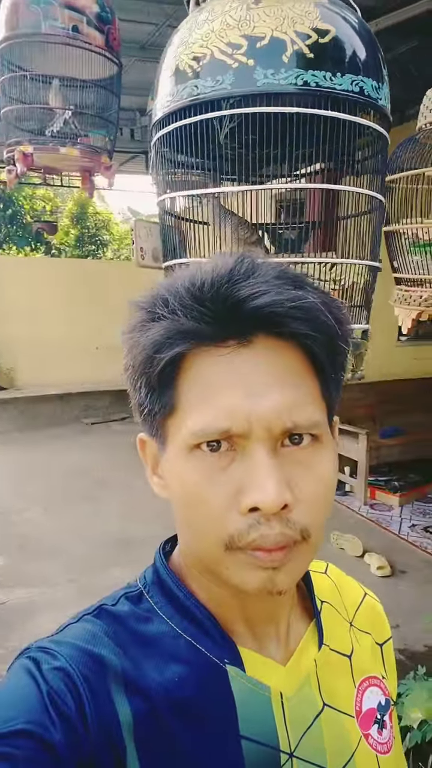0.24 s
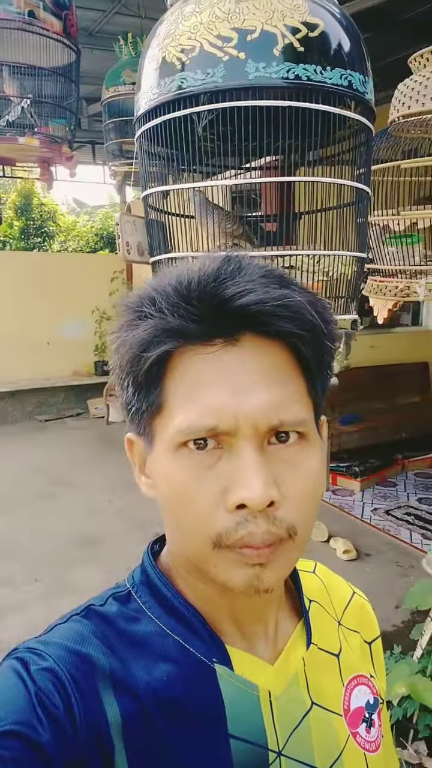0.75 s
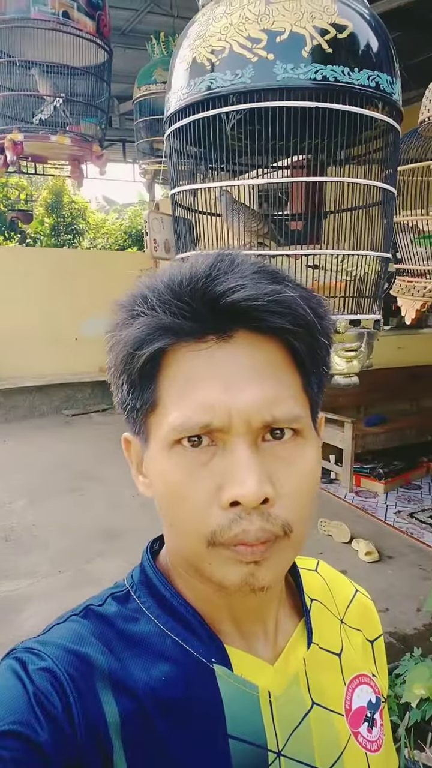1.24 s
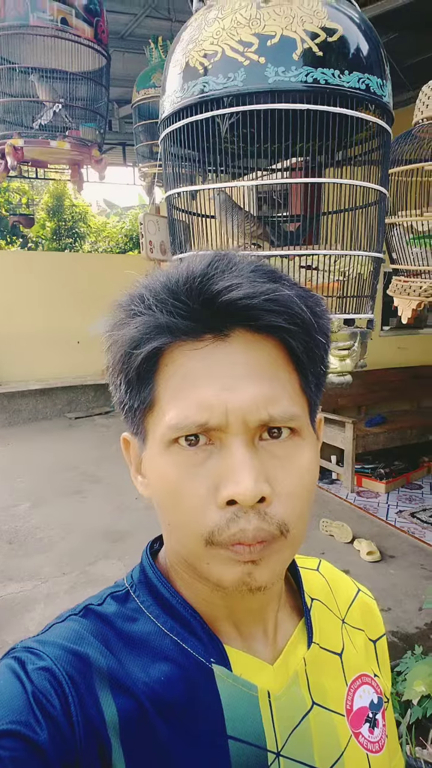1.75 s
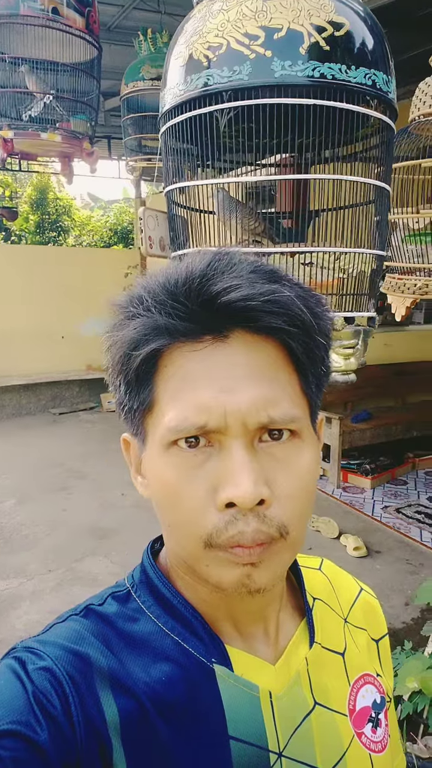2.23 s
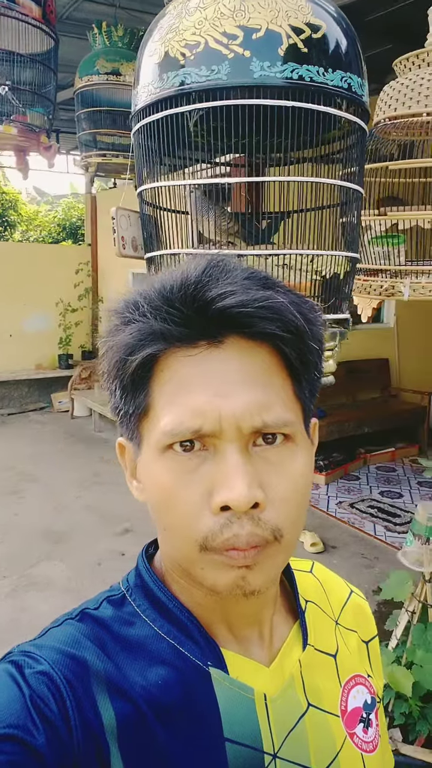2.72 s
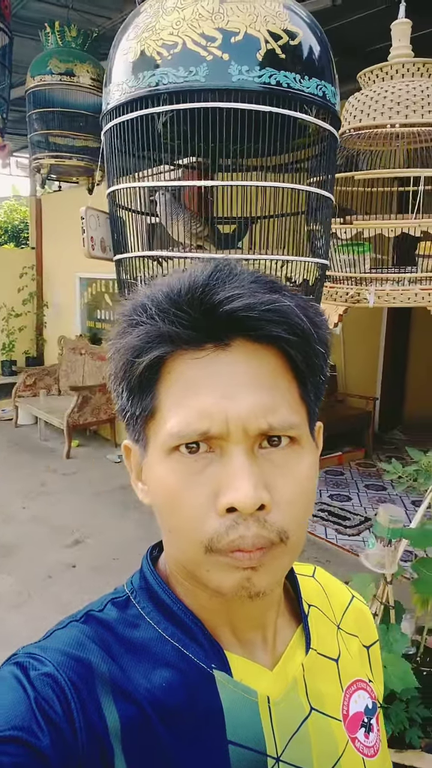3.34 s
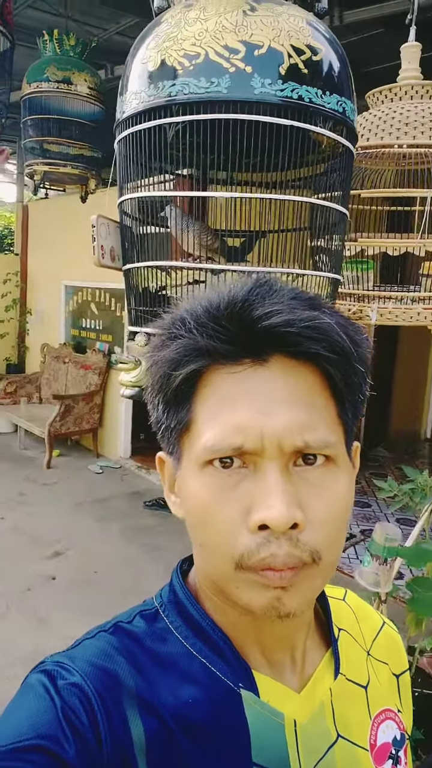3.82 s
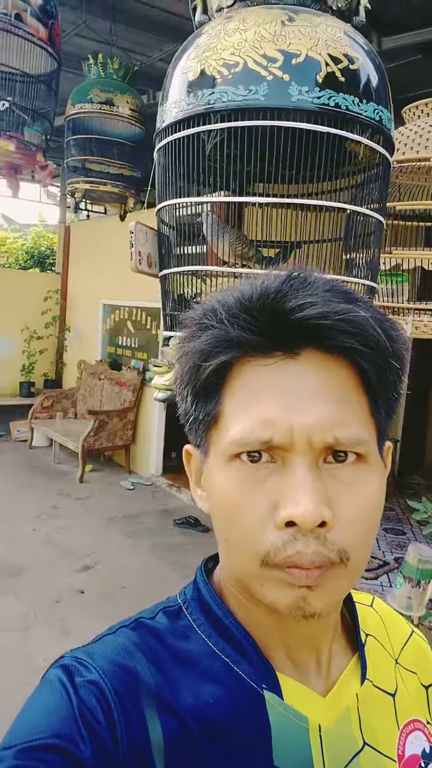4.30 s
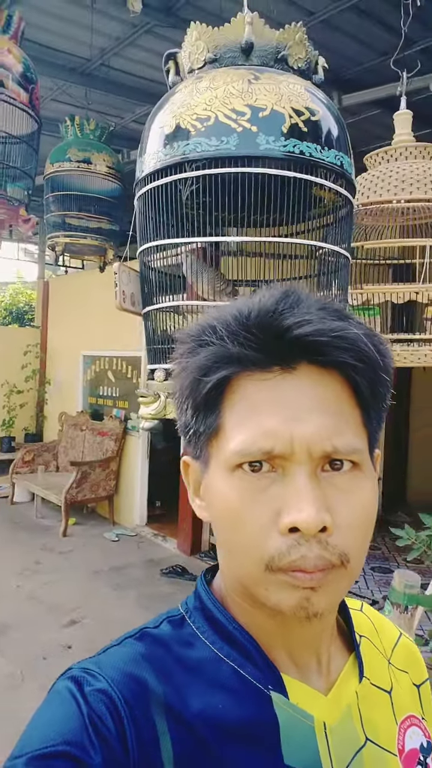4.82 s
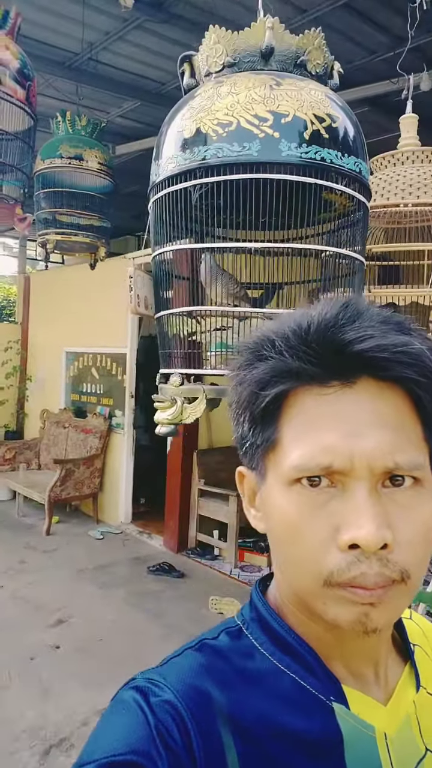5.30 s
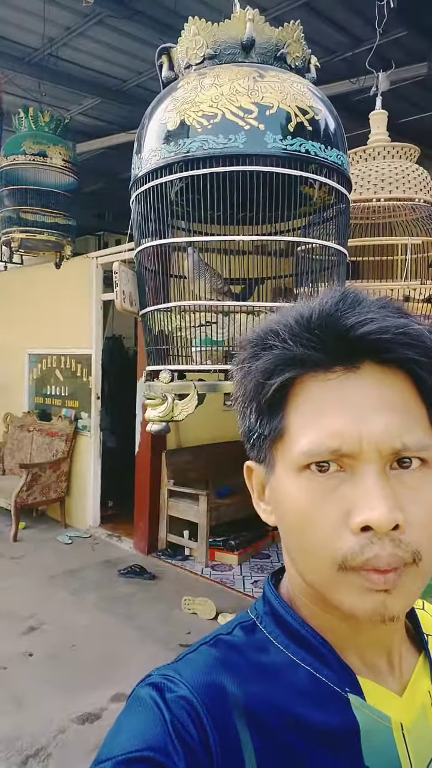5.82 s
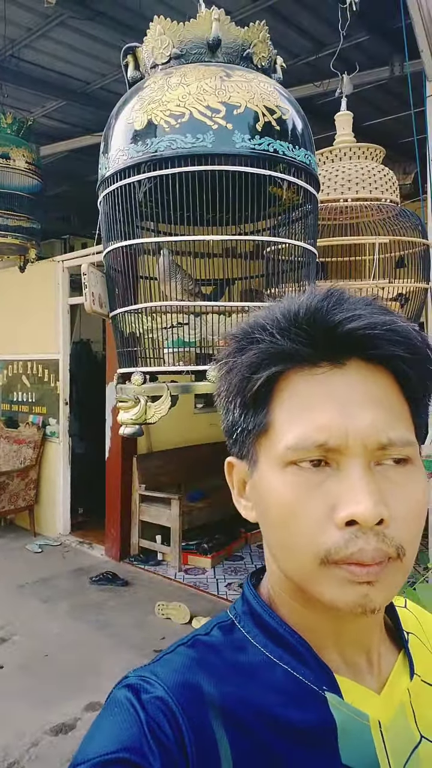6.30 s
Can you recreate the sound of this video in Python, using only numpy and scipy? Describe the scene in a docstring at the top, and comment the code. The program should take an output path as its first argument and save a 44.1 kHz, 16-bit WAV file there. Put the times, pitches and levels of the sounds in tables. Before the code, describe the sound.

Under a metal porch roof, a caged dove sings two nearly pure, stuttering phrases, each a held fluttering note, four quick pulses and a closing note. Between and beneath them another dove repeats soft arched coos. Small birds chip and slur in the background, and a loud whistle bursts out late. Quiet traffic hum and cloth rustle on a hand-held microphone run throughout.

```python
"""A caged zebra dove sings two stuttering phrases under a metal porch roof: near-pure tones that rasp and scoop
up. A second dove repeats soft arched tones that waver as they rise. Sliding tones make small birds' chirps and
whistles from other cages; a warbling tone makes a far trill. Shaped noise and a low harmonic tone make the
street's hum. The hand-held microphone picks up noise rustle, decaying noise ticks and low sine bumps; bursts of
high noise come and go."""
import sys
import numpy as np
from scipy import signal
from scipy.fft import rfft, irfft
from scipy.io import wavfile
from scipy.ndimage import map_coordinates

SR = 44100
rng = np.random.default_rng(int(sys.argv[2]) if len(sys.argv) > 2 else 0)


def output_pcm(signal):
    """Save a mono or channel-first signal as 16-bit PCM at the path in sys.argv[1].

    Samples are clipped to [-1, 1] before scaling.
    """
    pcm = np.clip(np.atleast_2d(signal).T, -1, 1) * 32767
    wavfile.write(sys.argv[1], SR, np.round(pcm).astype(np.int16))


N = 288855
TIME = np.arange(N) / SR

# Street fading unevenly. Each row: time in seconds, traffic and airy hiss in dB before their lifts in the mix.
STREET_LEVELS = [(0, -55, -61.5), (.9, -56, -65.5), (2.5, -57.5, -66), (3.1, -58, -72), (4.7, -57.5, -71),
                 (5.1, -60.5, -74), (6.55, -61.5, -71)]
# Far engine. Each row: time in seconds, mean cycles per second, level in dB before trim and throb.
ENGINE_COURSE = [(.1, 21.6, -57), (.6, 24.1, -57.5), (1.9, 24, -60), (2.15, 23.5, -57.5),
                 (2.6, 21.4, -59.5), (3.1, 23.2, -72), (4.3, 23.8, -59), (5.1, 21.8, -69.5),
                 (6.55, 21.3, -64)]
# Engine harmonics. Each row: multiple of the cycle rate, relative level in dB.
ENGINE_HARMONICS = [(2, -14), (4, -1), (5, -2.5), (6, -15.5), (7, -14.5), (8, -14), (9, -12.5)]
# Noise spectra. Each row: frequency in Hz, relative density in dB per Hz.
TRAFFIC_SPECTRUM = [(40, -23), (100, 6.5), (160, 1.5), (210, 0.5), (400, -2.5), (560, 1.5), (1000, -1),
                    (1600, -3.5), (2600, -8.5), (4000, -19.5), (8000, -23)]
RUMBLE_SPECTRUM = [(20, 8), (35, -4), (55, 7), (75, 0.5), (140, -15.5), (400, -59)]
HISS_SPECTRUM = [(1000, -4.5), (2500, 3.5), (4000, 3), (6000, -9), (7800, 1.5), (9200, -17.5), (15500, -31)]
RUSTLE_SPECTRUM = [(3000, -18), (6000, -4), (7800, 1.5), (9200, -12.5), (11000, -10), (13000, -1.5),
                   (15500, 4.5)]
SNAP_SPECTRUM = [(3000, -4), (6000, -12), (8000, 0.5), (9500, -14.5), (12000, -2), (15500, 1.5)]

# Steady rustle of the hand on the microphone. Each row: time in seconds, level in dB before flicker and lift.
RUSTLE_LEVELS = [(0, -59), (.35, -60.5), (.65, -64.5), (1.1, -60.5), (2.3, -60), (2.5, -64), (4.7, -62),
                 (6.55, -63.5)]
RUSTLE_FLICKER_DB, RUSTLE_FLICKER_HZ = 2.7, 14
# Bursts of high noise. Each row: start in seconds, length in seconds, crest level in dB before the lift.
NOISE_BURSTS = [(0.403, .07, -54), (1.332, 0.14, -54), (1.458, .1, -56), (2.859, 0.13, -58),
                (3.108, 0.1, -60), (3.533, 0.27, -55.5), (3.662, 0.17, -56), (4.12, 0.18, -52.5),
                (4.25, 0.065, -59), (4.65, 0.059, -55), (5.21, 0.073, -60), (5.355, 0.12, -55.5),
                (5.48, 0.13, -55)]
BURST_RISE = 0.15  # share of a burst spent swelling
# Small ticks of handling. Each row: start in seconds, initial level in dB.
HANDLING_TICKS = [(2.3002, -34), (3.5613, -35.5), (3.5934, -36), (5.3536, -39), (5.918, -39), (6.016, -38)]
# Soft bumps of the hand. Each row: middle in seconds, level in dB.
HAND_BUMPS = [(.84, -44), (2.37, -46.5), (4.40, -42)]

# Faint lower peeps from cages further off. Each row: start in seconds, start pitch in Hz, level in dB before the mix.
FAR_PEEPS = [(.02, 3670, -59), (.47, 4900, -58.5), (1.12, 5480, -60), (1.475, 4990, -57.5),
             (3.625, 4840, -57.5), (4.52, 4560, -62), (4.835, 5080, -55.5), (6.06, 3930, -62.5)]
PEEP_S, PEEP_FALL = 0.04, 0.126  # length; share of its pitch that a peep loses
# Small birds' short high chips. Each row: start in seconds, start pitch in Hz, level in dB before the mix.
HIGH_CHIPS = [(.41, 7950, -58), (1.07, 7185, -51), (1.459, 7410, -53), (1.853, 7300, -49),
              (2.20, 7140, -53.5), (2.601, 7000, -58), (3.62, 6870, -61), (5.369, 7060, -57.5),
              (6.41, 7270, -51)]
CHIP_S, CHIP_FALL = 0.035, 0.091  # length; share of its pitch that a chip loses
# Down-slurred calls. Each row: start in seconds, length in seconds, end pitch in Hz, level in dB before the mix.
SLURRED_CALLS = [(0.438, 0.029, 5170, -59), (1.545, 0.071, 4610, -48.5), (1.752, 0.069, 5030, -46),
                 (2.235, .036, 5200, -57), (2.287, 0.046, 4840, -49.5), (4.818, 0.028, 5540, -53.5),
                 (6.06, .08, 4710, -49.5), (6.246, 0.077, 5160, -49), (6.391, 0.07, 4910, -47)]
SLUR_START_HZ = 6195

TRILL_START_S, TRILL_LENGTH_S, TRILL_SWELL_S, TRILL_FADE_S = 0.5, 0.89, 0.39, 0.18
TRILL_HZ, TRILL_SAG_HZ_PER_S = 2175, 100  # pitch at the start, before the warble
TRILL_DB = -49.5  # before pulsing and the mix

# Whistles. Each row: start in seconds, length in seconds, start and end pitch in Hz, level in dB before the mix.
WHISTLE_NOTES = [(.668, 0.052, 2485, 2420, -53), (.768, 0.028, 2456, 2400, -54),
                 (5.332, 0.064, 3174, 3040, -55), (5.436, 0.036, 2755, 2910, -41.5),
                 (5.454, 0.068, 3222, 2977, -39.5), (5.519, 0.019, 2320, 2620, -39),
                 (5.522, 0.027, 3050, 2875, -35), (5.530, 0.07, 2647, 2623, -41),
                 (5.578, 0.026, 2730, 2716, -31), (5.662, 0.015, 4190, 3675, -53.5),
                 (5.67, 0.014, 3720, 3350, -49), (5.68, 0.016, 2380, 2000, -55)]
# Harmonics of a whistle. Each row: multiple of its pitch, relative level in dB.
WHISTLE_HARMONICS = [(1, 0.5), (2, -41), (4, -31), (5, -29)]

# Second dove's soft notes. Each row: start in seconds, time to the crest in seconds, level in dB before the swell.
SOFT_NOTES = [(1.664, 0.065, -41), (1.995, .1, -40), (2.24, 0.092, -39.5), (2.495, 0.097, -38.5),
              (2.755, 0.092, -39.5), (3.009, 0.099, -39), (3.271, .11, -40.5), (3.529, .12, -40),
              (3.785, .12, -41), (4.035, 0.099, -42), (4.280, 0.094, -41)]
# Pitch arch of a soft note. Each row: time over time to the crest, pitch over top pitch.
SOFT_ARCH = [(0, .80), (.2, .87), (.45, .96), (.75, .992), (1, 1), (1.3, .99), (2, .955)]
# Swell of a soft note. Each row: time over time to the crest, relative level in dB.
SOFT_SWELL = [(0, -28), (.2, -9), (.45, -10), (.72, -9.5), (1, 2), (1.22, -1), (1.55, -11.5), (2, -25.5)]
MURMUR_HZ, MURMUR_SAG_HZ_PER_S = 1235, 9.7  # top pitch of the first; the series slowly sinks

# Creaks just before each phrase. Each row: start in seconds, pitch in Hz, level in dB before the rasp.
PHRASE_CREAKS = [(1.787, 1107, -34.5), (4.180, 890, -32.5)]
CREAK_S, CREAK_RASP = 0.028, 0.6  # length; depth of roughness

# Loud notes; a phrase is a held note, four stutters and a closing note. Each row: start in seconds,
# length in seconds, pitch in Hz before the sag, base level in dB, base level of the scoop in dB.
LOUD_NOTES = [(1.798, 0.23, 1304, -34, -21.5), (2, 0.037, 1220, -26, -30), (2.07, 0.039, 1158, -29, -24.5),
              (2.143, 0.043, 1159, -28.5, -24.5), (2.221, 0.041, 1177, -30.5, -25),
              (2.326, 0.15, 1255, -38.5, -24.5), (4.194, .198, 1308, -27.5, -30),
              (4.415, 0.043, 1153, -29.5, -31), (4.488, 0.042, 1151, -29, -29),
              (4.560, 0.044, 1150, -28.5, -28.5), (4.651, 0.05, 1190, -33, -27),
              (4.809, 0.12, 1241, -35.5, -26)]
STUTTER_S = 0.042  # reference length for scoop and sag
SCOOP_S, SCOOP_GROWTH = 0.0113, 0.3066  # a stutter's upward scoop; power of length that slows longer ones
SCOOP_STEEPNESS = 2.64  # higher: the voice stays low longer, then jumps
SAG_SHARE, SAG_GROWTH = 0.068, 0.405  # share of pitch a stutter loses; power of length that deepens it
PUFF_DB, PUFF_AT, PUFF_WIDTH = 2.5, 0.77, 0.068  # accent; its place and width as shares of the scoop
COO_FADE_DB_PER_S, COO_RASP = 19, 0.76  # fade of a note; depth of roughness at its start
COO_ATTACK, COO_RELEASE_S = 1.23, 0.012  # attack as a multiple of the scoop; release
THROAT_RING_DB = 4  # how hard the throat is driven, over the level of the scoop

# Cage dome, then roof. Each row: delay in seconds, level in dB.
EARLY_ECHOES = [(.0062, -19.5), (0.0139, -14.5)]
CUTOFF_HZ = 15900


def from_db(db):
    """Decibels to gain."""
    return 10 ** (np.asarray(db) / 20)


def rms_one(x):
    """Scale to unit power."""
    return x / np.sqrt(np.mean(x ** 2) + 1e-20)


def in_time(rows):
    """One curve per column, for every sample."""
    s, *columns = np.transpose(rows)
    return [np.interp(TIME, s, column) for column in columns]


def add(out, s, sound):
    """Mix a sound in at a time in seconds."""
    at = max(round(s * SR), 0)
    out[at:at + len(sound)] += sound[:max(N - at, 0)]


def clock(length):
    """Sample times of a short sound."""
    return np.arange(int(length * SR)) / SR


def drift(rate):
    """Smooth random wandering with unit power, from rate random points a second."""
    knots = rng.standard_normal(4000)
    return rms_one(map_coordinates(knots, [TIME * rate], order=3, mode="wrap"))


def tone(hz, partials):
    """A gliding tone of (multiple, dB) partials; a 0 dB partial has unit power."""
    phase = 2 * np.pi * np.cumsum(hz) / SR
    return np.sqrt(2) * sum(from_db(db) * np.sin(round(k) * phase) for k, db in partials)


def gate(t, length, attack, release):
    """Rounded opening and closing of a note."""
    opening = np.sin(np.pi / 2 * np.clip(t / attack, 0, 1))
    closing = np.sin(np.pi / 2 * np.clip((length - t) / release, 0, 1))
    return (opening * closing) ** 2


def noise(colour):
    """Steady unit-power noise with a given spectrum, thinned below about 15 Hz."""
    hz, db = np.transpose(colour)
    bins = np.maximum(np.arange(N // 2 + 1) * SR / N, 1)
    gain = from_db(np.interp(np.log(bins), np.log(hz), db)) * bins / np.hypot(bins, 15)
    return rms_one(irfft(rfft(rng.standard_normal(N)) * gain, N))


def resonance(x, hz, width_hz):
    """One ringing resonance with about unit gain on top."""
    r = np.exp(-np.pi * width_hz / SR)
    feed = np.array([1, 0, -1]) * (1 - r * r) / 2
    ring = [1, -2 * r * np.cos(2 * np.pi * hz / SR), r * r]
    return signal.lfilter(feed, ring, x + 1e-18)


def porch(x, wet_db, t60, gap=0.0037):
    """The diffuse tail of the porch: after a short gap, dense reflections die away."""
    t = clock(1)
    tail = rng.standard_normal(len(t)) * from_db(-60 * t / t60) * np.clip(t / gap - 1, 0, 1)
    tail /= np.sqrt(np.sum(tail ** 2))
    return from_db(wet_db) * signal.fftconvolve(x, tail)[:N]


def glides(notes, partials, hold, rough, attack, release):
    """Songbird notes hold a clean pitch a moment, then slide to the end pitch, quavering more as they go."""
    out, quaver = np.zeros(N), rough * drift(600)
    for s, length, start_hz, end_hz, level_db in notes:
        t = clock(length)
        slide = np.sin(np.pi / 2 * (t / length) ** hold) ** 2
        hz = start_hz + (end_hz - start_hz) * slide
        hz *= 1 + slide * np.interp(s + t, TIME, quaver)
        envelope = from_db(level_db) * gate(t, length, attack * length, release * length)
        add(out, s, tone(hz, partials) * envelope)
    return out


def street(rumble_db=-59.5, engine_waver=0.0038, engine_throb_db=1.0):
    """Steady low rumble, distant traffic and airy hiss are shaped noise; one wavering engine is harmonic."""
    traffic_db, hiss_db = in_time(STREET_LEVELS)
    cycle_hz, engine_db = in_time(ENGINE_COURSE)
    engine = tone(cycle_hz * (1 + engine_waver * drift(24.45)), ENGINE_HARMONICS)
    engine *= from_db(engine_db - 1 + engine_throb_db * drift(11))
    traffic = noise(TRAFFIC_SPECTRUM) * from_db(traffic_db + 3)
    rumble = noise(RUMBLE_SPECTRUM) * from_db(rumble_db)
    hiss = noise(HISS_SPECTRUM) * from_db(hiss_db + 5.5)
    return engine + traffic + rumble + hiss


def rustle_strength():
    """Strength of the high noise: a flickering steady rustle, and bursts that swell quickly and ebb."""
    steady_db, = in_time(RUSTLE_LEVELS)
    power = from_db(steady_db + RUSTLE_FLICKER_DB * drift(RUSTLE_FLICKER_HZ)) ** 2
    for s, length, level_db in NOISE_BURSTS:
        swell = gate(clock(length), length, BURST_RISE * length, (1 - BURST_RISE) * length)
        add(power, s, (from_db(level_db) * swell) ** 2)
    return np.sqrt(power)


def handling(tick_t60=0.0069, creases_per_s=40, crease_db=6.0, crease_t60=0.05, bump_hz=34, bump_length=0.0864):
    """Rustle and bursts are high noise with tiny snaps; the hand adds dry ticks and low bumps."""
    strength = rustle_strength()
    bumps, t = np.zeros(N), clock(bump_length)
    creases = (rng.random(N) < creases_per_s / SR) * rng.uniform(0, 2, N)  # random moments and strengths
    crease_decay = from_db(crease_db - 60 * t / crease_t60)
    snaps = strength * signal.fftconvolve(creases, crease_decay)[:N]  # stronger noise snaps louder
    for s, level_db in HANDLING_TICKS:
        add(snaps, s, from_db(level_db - 60 * t / tick_t60))
    for s, level_db in HAND_BUMPS:
        bump = np.sin(2 * np.pi * bump_hz * t) * np.hanning(len(t))
        add(bumps, s - bump_length / 2, from_db(level_db) * bump)
    return from_db(4.0) * strength * noise(RUSTLE_SPECTRUM) + snaps * noise(SNAP_SPECTRUM) + bumps


def small_birds():
    """Bright chips and duller peeps each have one length and fall a little; slurs hold a pitch, then slide far down."""
    peeps = [(s, PEEP_S, hz, hz * (1 - PEEP_FALL), db) for s, hz, db in FAR_PEEPS]
    chips = [(s, CHIP_S, hz, hz * (1 - CHIP_FALL), db) for s, hz, db in HIGH_CHIPS]
    slurs = [(s, length, SLUR_START_HZ, end_hz, db) for s, length, end_hz, db in SLURRED_CALLS]
    bright = glides(chips, [(1, 1.5), (2, -6.5)], hold=1.64, rough=0.016, attack=0.18, release=0.038)
    dull = glides(peeps + slurs, [(1, 1.5), (2, -22)], hold=1.4, rough=0.017, attack=0.31, release=0.018)
    return bright + dull


def trill(warble_hz=27, warble_depth=0.046, rough=0.015, pulse_db=4):
    """A far bird swells, pulses and warbles quickly round a slowly sinking pitch, and fades."""
    t, warble = TIME - TRILL_START_S, 2 * np.pi * warble_hz * TIME
    hz = TRILL_HZ - TRILL_SAG_HZ_PER_S * t
    hz *= 1 + warble_depth * np.sin(warble) + rough * drift(120)
    pulse = from_db(TRILL_DB + pulse_db * np.cos(warble))
    return tone(hz, [(1, 0)]) * pulse * gate(t, TRILL_LENGTH_S, TRILL_SWELL_S, TRILL_FADE_S)


def whistling_birds():
    """Whistles leave their first pitch early, open fast and close more gently, with faint overtones."""
    return glides(WHISTLE_NOTES, WHISTLE_HARMONICS, hold=0.75, rough=0.013, attack=0.071, release=0.28)


def murmurs(waver=0.021, waver_hz=110):
    """Soft notes waver as they rise, then steady and swell at the crest of their arch."""
    out, unsteady = np.zeros(N), waver * drift(waver_hz)
    for s, crest, level_db in SOFT_NOTES:
        t = clock(2 * crest)
        top_hz = MURMUR_HZ - MURMUR_SAG_HZ_PER_S * (s - SOFT_NOTES[0][0])
        arch = np.interp(t / crest, *np.transpose(SOFT_ARCH))
        swell_db = np.interp(t / crest, *np.transpose(SOFT_SWELL))
        # weak airflow holds the pitch less firmly
        wobble = 1 + (1 - from_db(swell_db)) * np.interp(s + t, TIME, unsteady)
        voice = tone(top_hz * arch * wobble, [(1, 0.5), (2, -22.5)])
        voice *= from_db(level_db + swell_db)
        add(out, s, voice * gate(t, 2 * crest, attack=0.0064, release=0.0087))
    return out * from_db(1.9 * drift(80) - 1)  # the level flickers


def creaks():
    """The voice catches roughly for a moment before each phrase."""
    out, t, rattle = np.zeros(N), clock(CREAK_S), drift(500)
    for s, hz, level_db in PHRASE_CREAKS:
        voice = from_db(level_db) * np.sin(2 * np.pi * hz * t)
        add(out, s, voice * gate(t, CREAK_S, attack=0.0095, release=0.015))
    return out * (1 + CREAK_RASP * rattle)


def coos(start_hz=775, throat_hz=895, throat_width_hz=125, flutter_hz=35.64, flutter_db=2.5, flutter_bend=0.029):
    """Near-pure notes start with a rasp, set the throat ringing as they scoop upward, then sag; held notes flutter."""
    out, throat = np.zeros(N), np.zeros(N)
    rattle = drift(500)
    for s, length, top_hz, level_db, scoop_db in LOUD_NOTES:
        t = clock(length)
        scoop = SCOOP_S * (length / STUTTER_S) ** SCOOP_GROWTH
        sag = SAG_SHARE * (length / STUTTER_S) ** SAG_GROWTH
        opening = np.exp(-(t / scoop) ** SCOOP_STEEPNESS)  # 1 at the start, 0 once scooped
        flutter = np.cos(2 * np.pi * flutter_hz * t) * np.clip(t / 0.045, 0, 1) ** 3
        hz = top_hz - (top_hz - start_hz) * opening - top_hz * sag * (t / length) ** 1.695
        voice = tone(hz * (1 + flutter_bend * flutter), [(1, -3.5), (2, -41.0)])
        # the membranes catch unevenly at first
        voice *= 1 + COO_RASP * opening * np.interp(s + t, TIME, rattle)
        puff_db = PUFF_DB * np.exp(-((t / scoop - PUFF_AT) / PUFF_WIDTH) ** 2)
        voice *= from_db(puff_db - COO_FADE_DB_PER_S * t + flutter_db * flutter)
        voice *= gate(t, length, COO_ATTACK * scoop, COO_RELEASE_S)
        add(out, s, voice * from_db(level_db + (scoop_db - level_db) * opening))
        add(throat, s, voice * from_db(scoop_db + THROAT_RING_DB))
    ringing = resonance(throat, throat_hz, throat_width_hz)
    return (out + ringing) * from_db(0.9 * drift(130))  # the level flickers


def scene(dove_lowest_hz=640):
    """The singing dove is close and fairly dry; the other birds are heard more by reflection."""
    background = street() + handling()
    chirps = small_birds()
    far = trill()
    whistles = whistling_birds()
    soft = murmurs()
    # a small body radiates no lows
    body = signal.butter(4, dove_lowest_hz, "high", fs=SR, output="sos")
    loud = signal.sosfilt(body, coos() + creaks())

    doves = loud + from_db(0.5) * soft
    echoes = sum(from_db(db) * np.interp(TIME - delay, TIME, doves) for delay, db in EARLY_ECHOES)
    birds = doves + echoes + porch(loud, wet_db=-10, t60=0.42) + porch(soft, wet_db=-3.0, t60=0.65)
    birds += from_db(-9) * chirps + porch(chirps, wet_db=1.5, t60=0.62)
    birds += from_db(-1.0) * whistles + porch(whistles, wet_db=-1.5, t60=0.48)
    birds += from_db(-6.5) * far + porch(far, wet_db=-0.5, t60=0.4)
    return (birds + background)[None]


def record(dry):
    """The top is cut steeply."""
    top_cut = signal.ellip(12, 0.1, 70, CUTOFF_HZ, fs=SR, output="sos")  # order, ripple dB, stopband dB
    return signal.sosfilt(top_cut, dry)


dry = scene()
out = record(dry)
output_pcm(out)
```